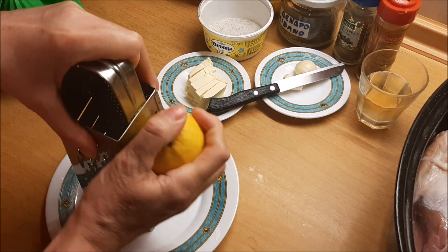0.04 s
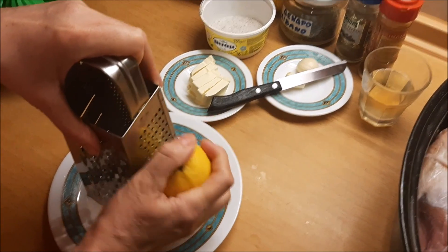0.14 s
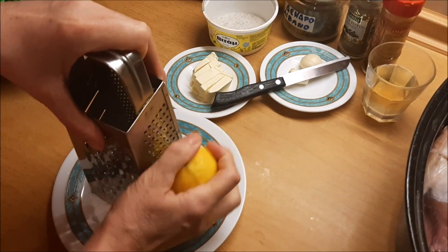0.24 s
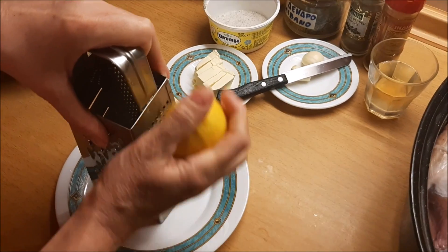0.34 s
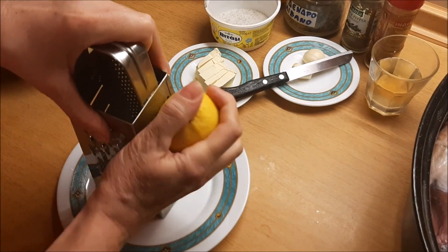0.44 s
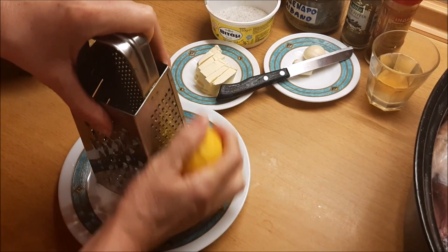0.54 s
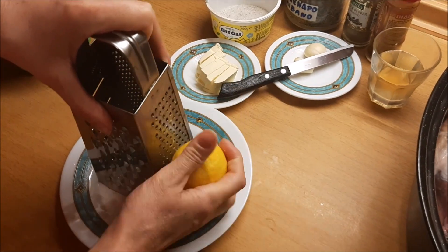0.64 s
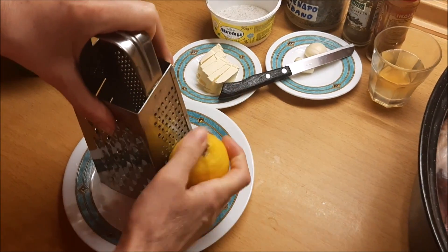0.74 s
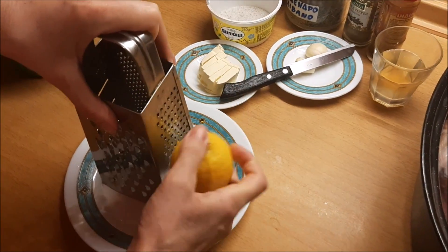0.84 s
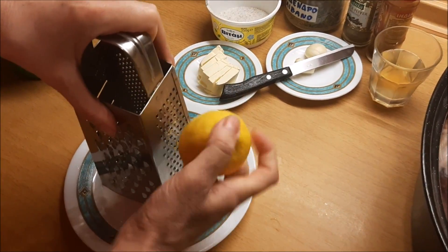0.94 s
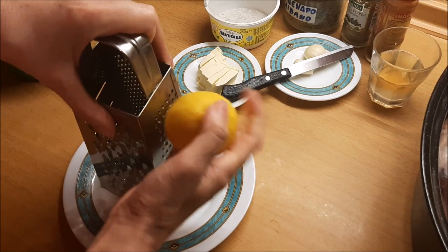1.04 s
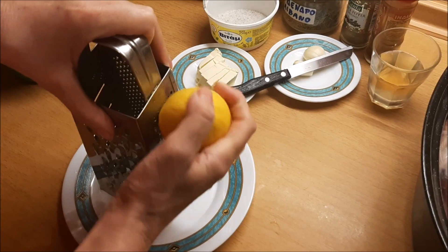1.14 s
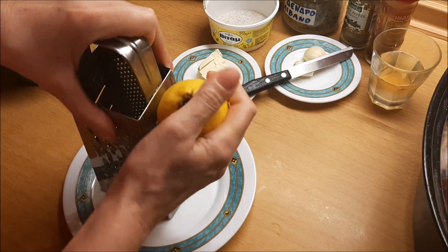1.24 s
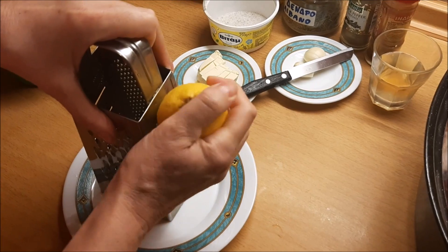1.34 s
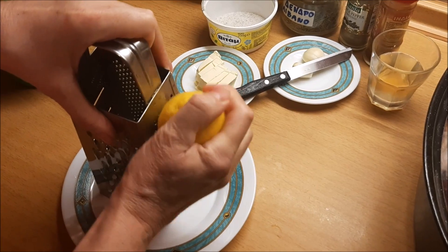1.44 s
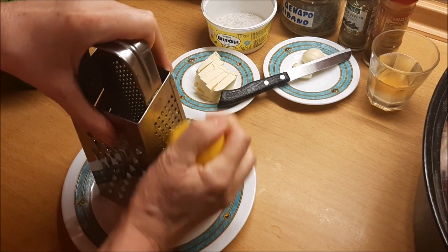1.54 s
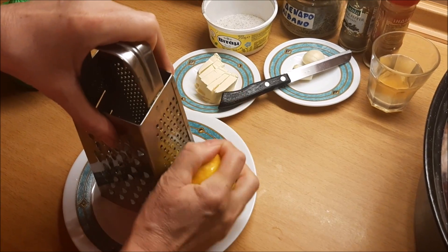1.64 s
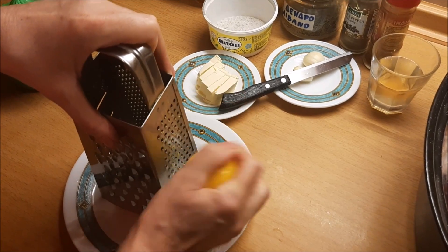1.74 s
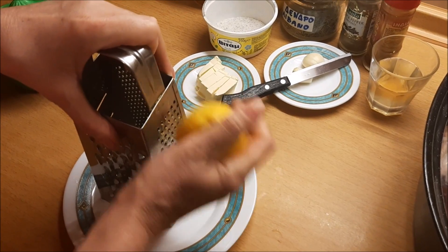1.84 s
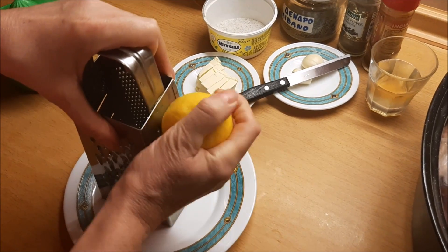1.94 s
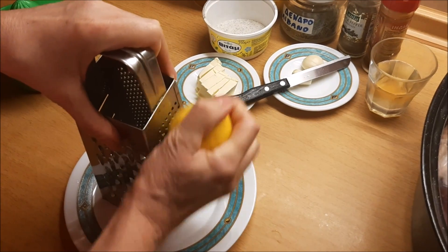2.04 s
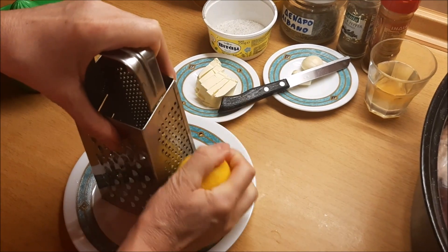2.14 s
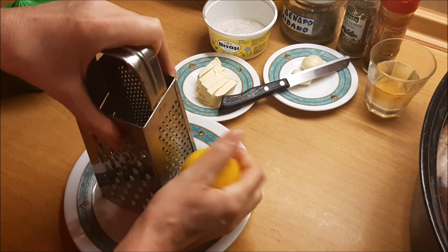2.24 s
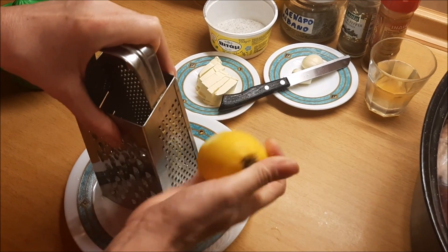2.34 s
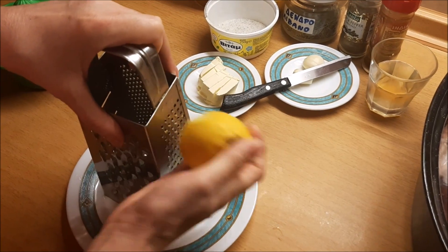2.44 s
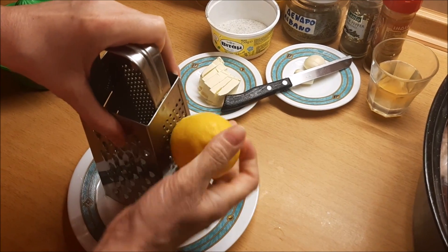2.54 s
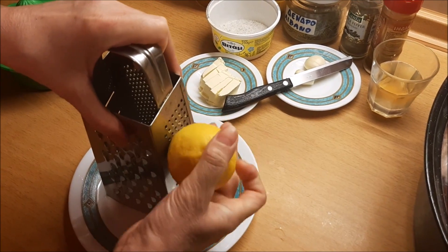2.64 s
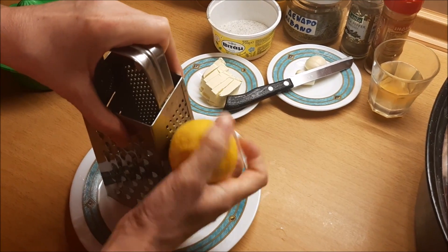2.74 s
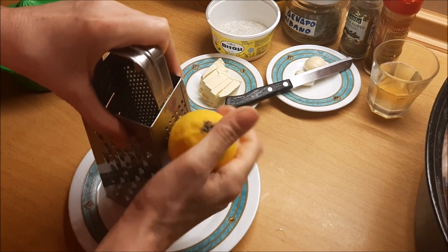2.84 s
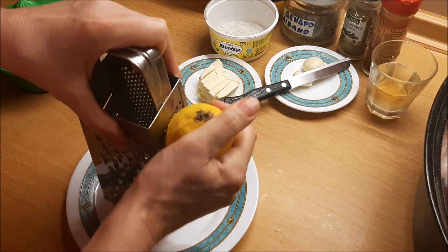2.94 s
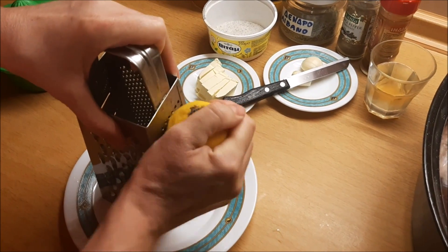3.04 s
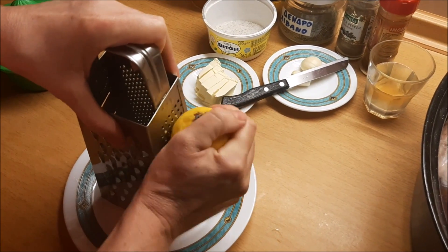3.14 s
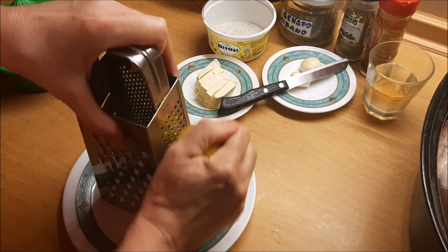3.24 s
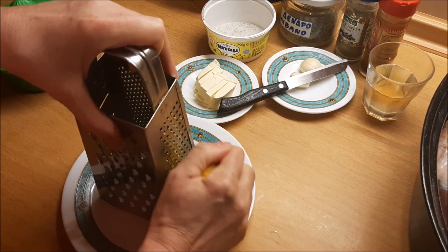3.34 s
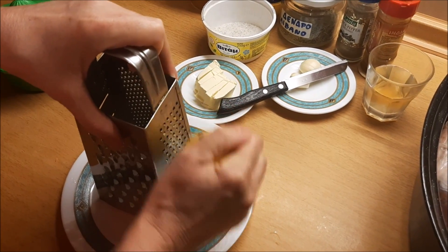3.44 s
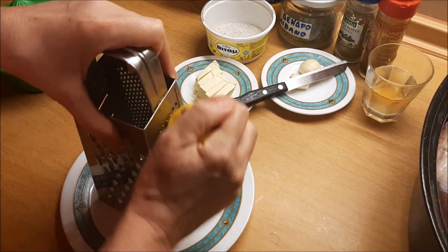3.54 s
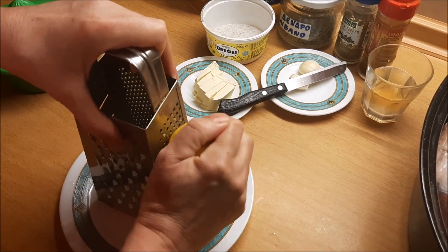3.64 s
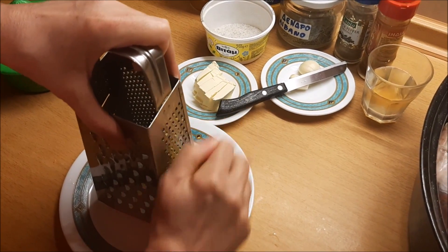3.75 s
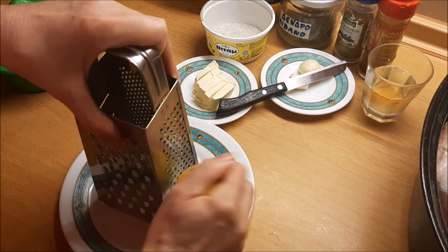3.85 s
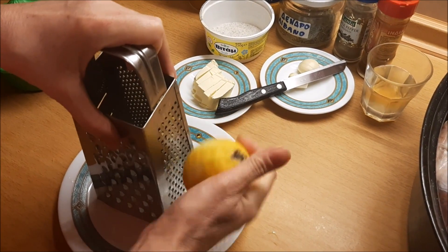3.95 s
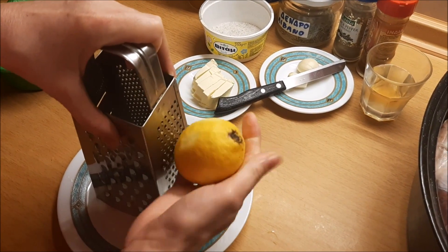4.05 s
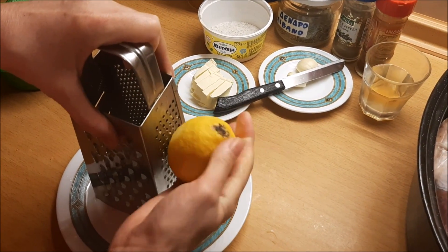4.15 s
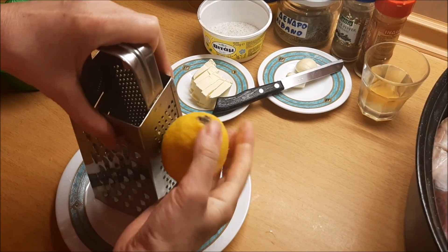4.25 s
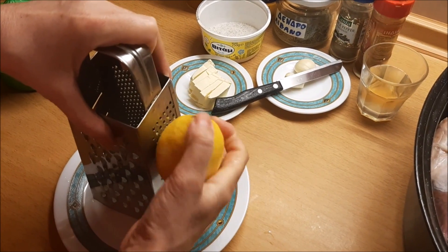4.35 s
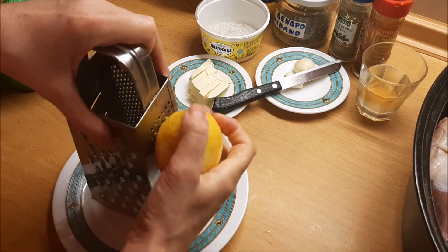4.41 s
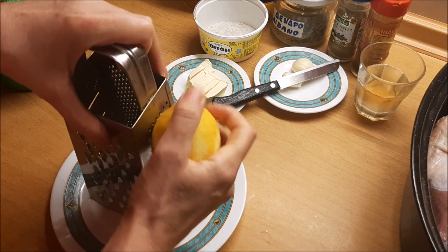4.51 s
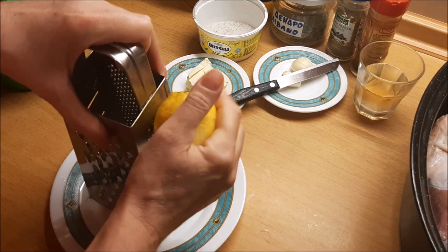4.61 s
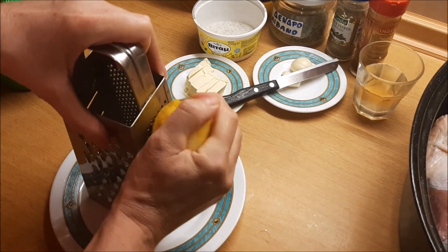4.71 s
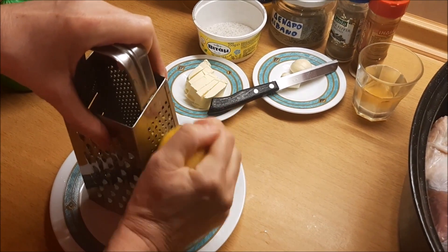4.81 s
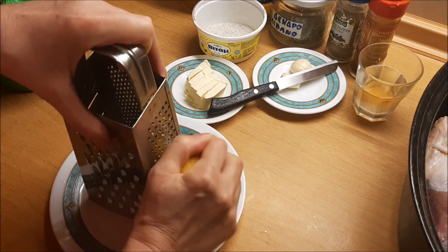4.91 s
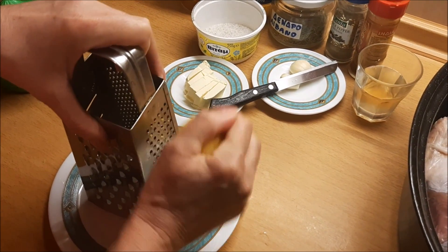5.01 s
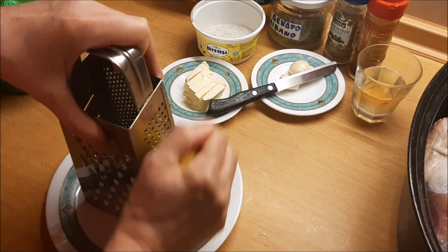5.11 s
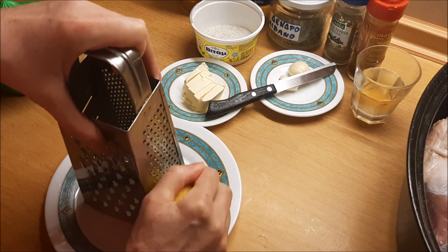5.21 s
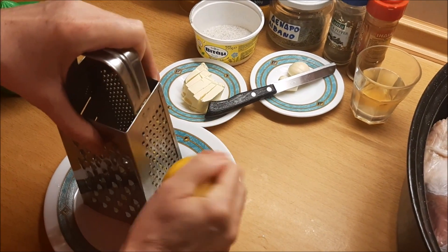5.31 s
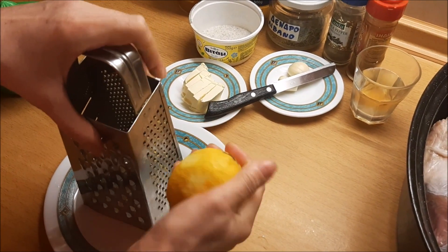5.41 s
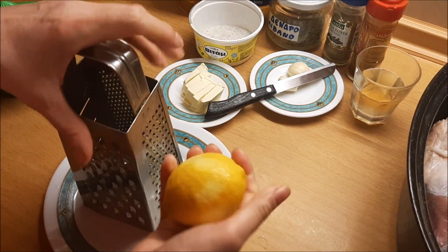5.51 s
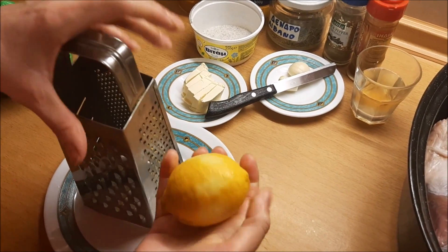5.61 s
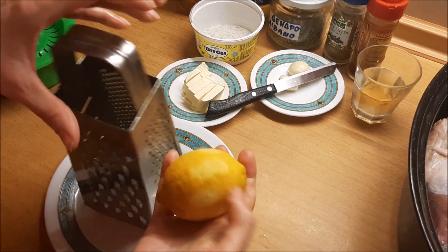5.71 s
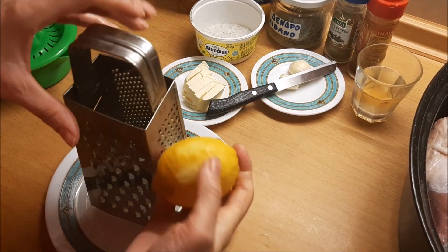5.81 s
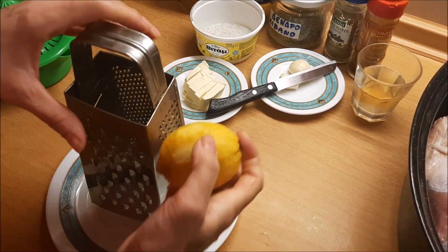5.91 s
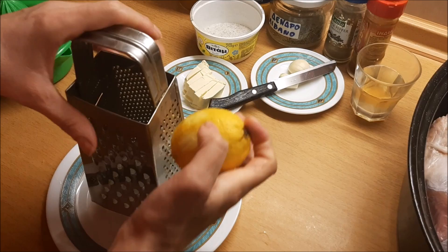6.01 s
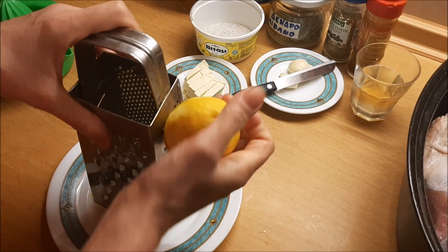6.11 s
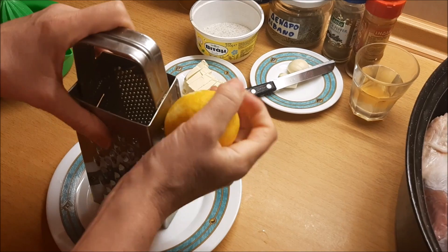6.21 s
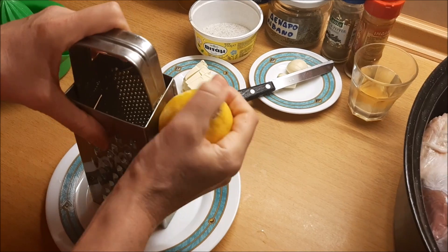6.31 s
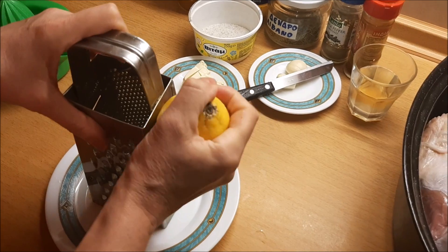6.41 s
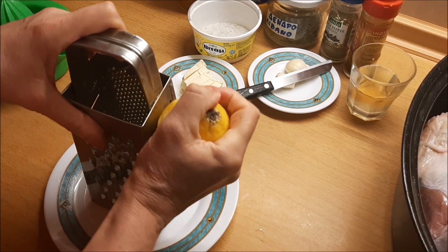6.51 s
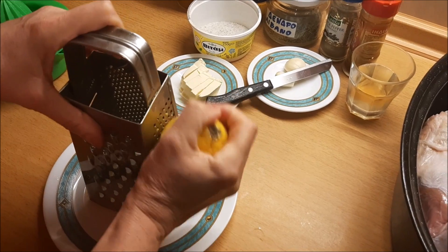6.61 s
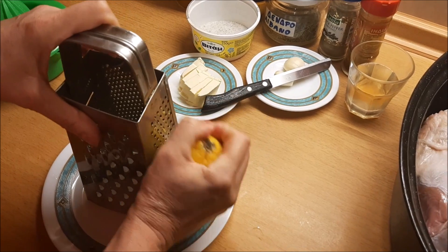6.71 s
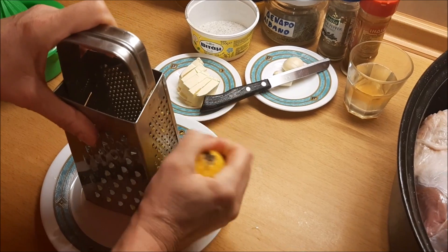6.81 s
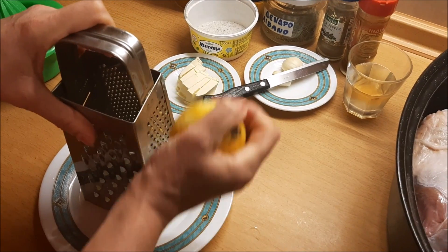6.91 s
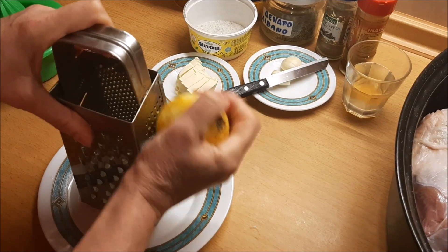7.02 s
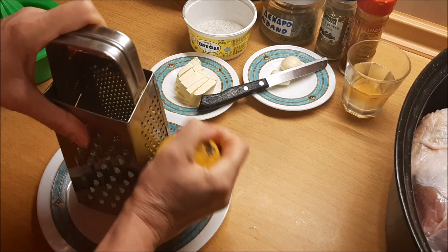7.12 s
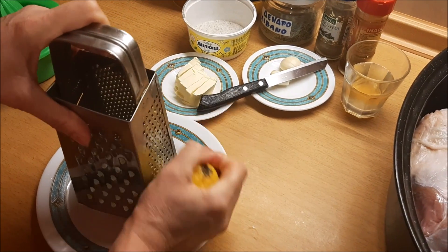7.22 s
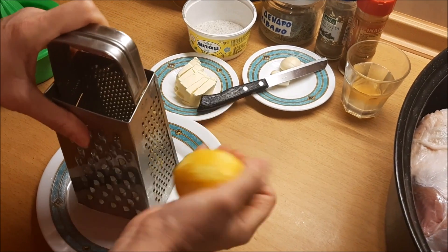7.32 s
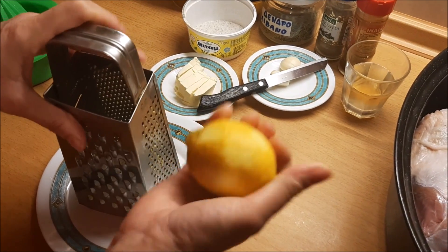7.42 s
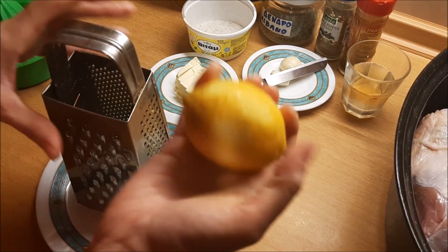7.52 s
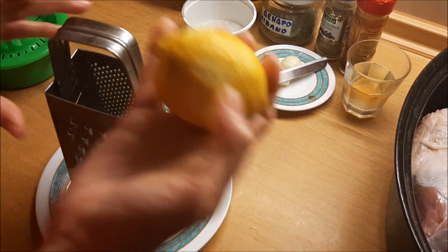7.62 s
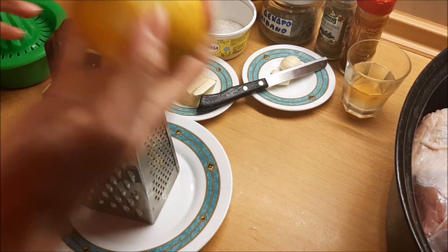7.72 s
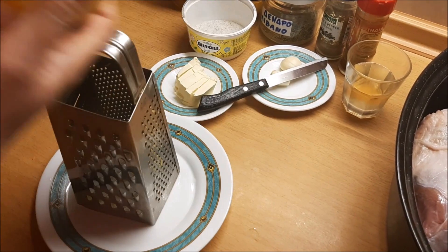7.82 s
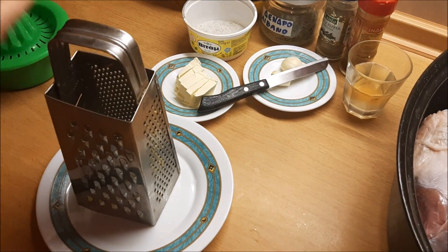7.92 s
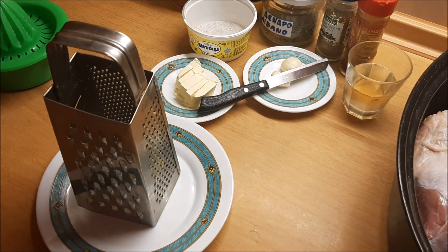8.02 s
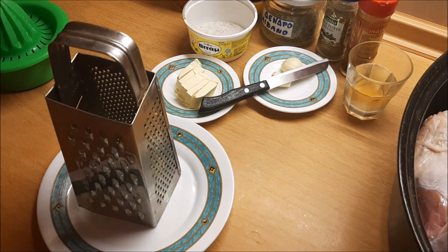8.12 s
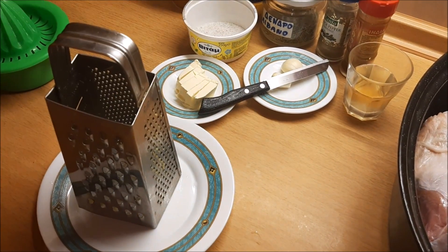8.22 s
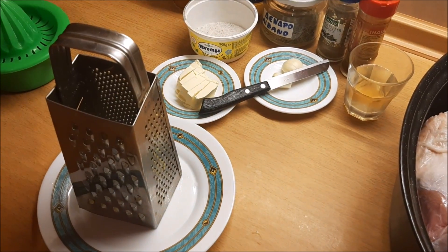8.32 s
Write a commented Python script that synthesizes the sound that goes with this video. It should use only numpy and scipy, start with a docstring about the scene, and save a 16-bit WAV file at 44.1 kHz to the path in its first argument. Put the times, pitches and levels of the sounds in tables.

```python
"""A lemon is rasped in short strokes down a steel box grater standing on a china plate in a small kitchen.
Teeth tear the peel in dense slips that hiss, ring the box and shake the table, and click where they
catch. The box knocks on the plate while held and clinks when shifted. A fridge hums faintly throughout,
and a few dull pats come at the end. Two microphone ports a few centimetres apart give the stereo image."""
import sys
import numpy as np
from scipy import signal
from scipy.fft import rfft, irfft, next_fast_len
from scipy.io import wavfile
from scipy.ndimage import uniform_filter1d

SR = 44100
rng = np.random.default_rng(int(sys.argv[2]) if len(sys.argv) > 2 else 0)


def materialize(psi):
    """Save the field psi as 16-bit PCM at rate SR to the path in sys.argv[1].

    A 1-D psi becomes a single channel; in a 2-D psi each row is a channel.
    """
    bounded = np.clip(np.atleast_2d(psi).T, -1, 1)
    quanta = np.round(bounded * 32767).astype(np.int16)
    wavfile.write(sys.argv[1], SR, quanta)


N = 368676

# resonances of the steel box while rubbed: f/Hz, width/Hz, level/dB
BOX_MODES = [(1074, 23, -22), (1274, 20, -13), (1788, 15, -7), (2163, 65, 0), (3015, 40, -4.5),
             (3195, 47, -7), (3777, 45, -3.5), (4140, 38, -10.5), (4510, 80, -12.5)]


def undb(db):
    """Decibels to gain."""
    return 10 ** (np.asarray(db) / 20)


def level(x, db):
    """Set the rms."""
    return x * undb(db) / np.sqrt(np.mean(x ** 2))


def along(points, hz):
    """Read a curve of (f/Hz, value) points on a log frequency axis."""
    freqs, values = np.transpose(points)
    return np.interp(np.log(hz + 1), np.log(freqs), values)


def shape(x, response):
    """Filter by a response given as a function of Hz."""
    n = next_fast_len(x.shape[-1], True)
    return irfft(rfft(x, n) * response(np.fft.rfftfreq(n, 1 / SR)), n)[..., :x.shape[-1]]


def colour(x, points):
    """EQ a sound with a curve of (f/Hz, level/dB) points."""
    return shape(x, lambda f: undb(along(points, f)))


def ring(x, peaks):
    """Drive resonators (f/Hz, width/Hz, level/dB), summed in alternating polarity."""
    return shape(x, lambda f: sum((-1) ** k * undb(db) * 1j * f * width / (hz ** 2 - f ** 2 + 1j * f * width)
                                  for k, (hz, width, db) in enumerate(peaks)))


def wander(rate):
    """A control signal gliding to `rate` random values a second; spread about 1.5."""
    step = int(SR / rate)
    return 1.8 * uniform_filter1d(np.repeat(rng.standard_normal(N // step + 1), step), step)[:N]


def ports(three, common=0.3, lag_ms=0.13):
    """A wide source: one signal reaches both ports, the right one later; each also hears its own."""
    late = np.roll(three[0], round(lag_ms * SR / 1000))
    return np.sqrt(common) * np.array([three[0], late]) + np.sqrt(1 - common) * three[1:]


def hand_pressure():
    """Gains of tearing, box and table: each stroke presses in, holds over rows of teeth, then lets go."""
    # strokes and light rubs: bite t/s, press-in/s, hold/s, tearing level at bite/dB, at end of hold/dB,
    # tooth rows/Hz, swing per row/dB, box above tearing/dB, table above tearing/dB
    strokes = [(-0.036, 0.024, 0.062, -61, -67, 23, 3.5, 15, 16.5),
               (0.153, 0.097, 0.059, -29.5, -32, 36.0, -1, 5.5, -3.0),
               (0.481, 0.014, 0.081, -37, -28.5, 31.0, 0.5, 5, -3.5),
               (0.574, 0.052, 0.028, -43.5, -35, 37, 0, 9.5, -0.5),
               (0.692, 0.028, 0.053, -51.5, -50.5, 37, 2, 3, -0.5),
               (0.861, 0.04, 0.061, -63, -74, 30.0, 0.0, 1, -4),
               (0.966, 0.01, 0.039, -76.5, -72.5, 19, 0, -1, 7),
               (1.579, 0.16, 0.052, -31.5, -28, 41.5, 1, 5, -1),
               (1.695, 0.021, 0.022, -40.5, -53.0, 41, 3, 6, 7),
               (1.751, 0.027, 0.25, -66, -70.5, 19.5, 1, 2.5, 1.5),
               (2.066, 0.15, 0.002, -48, -43, 22, 1.0, 6, 4.5),
               (2.095, 0.032, 0.063, -23.5, -23.5, 42.0, -1, 3.5, -6.0),
               (3.035, 0.07, 0.007, -70.5, -67.5, 32, 4.5, 9, 8.5),
               (3.092, 0.041, 0.023, -45, -39, 34, 3, 4, 2),
               (3.262, 0.12, 0.096, -34.0, -34, 40.0, 3, 4, -0.0),
               (3.616, 0.044, 0.012, -38.5, -31.5, 32, 5.5, 4, 0.5),
               (3.743, 0.037, 0.048, -30, -26.5, 34.5, 2, 4.5, -2.5),
               (4.043, 0.073, 0.03, -74, -77.0, 19.5, 3, 2.5, 7),
               (4.164, 0.021, 0.002, -81, -71, 29, 2, 9.5, 19.5),
               (4.341, 0.025, 0.019, -76.5, -74, 25.5, 4, 2.5, 21),
               (4.398, 0.027, 0.0035, -68, -65, 63, 2.5, 8, 10.5),
               (4.483, 0.032, 0.028, -55.5, -54.5, 48, 1.5, 0, -2.5),
               (4.616, 0.057, 0.083, -67.5, -76.5, 33, -1, -2, 0),
               (4.706, 0.01, 0.071, -68, -61.5, 29.0, 2.5, -1.5, 8),
               (4.829, 0.07, 0.039, -34, -29, 40.0, 5, 4.5, -1),
               (4.909, 0.013, 0.03, -39, -40.5, 45, 4.5, 6.0, 7.5),
               (5.2, 0.056, 0.027, -23.5, -28.5, 30, 2.5, 5, -6.5),
               (5.349, 0.012, 0.11, -67.5, -76, 18.0, 2, 7, -1.0),
               (5.493, 0.038, 0.012, -68.5, -66, 25, 1, 1, -1),
               (5.551, 0.02, 0.016, -60.5, -58, 31.0, 1, 4, -13.5),
               (6.41, 0.072, 0.002, -78.5, -86.5, 15, 3, -2.5, -5.5),
               (6.518, 0.018, 0.068, -75, -65.5, 28.5, 0, -3, 10),
               (6.598, 0.025, 0.007, -57.0, -54.5, 43.5, 0, 4.5, 7.5),
               (6.654, 0.024, 0.025, -37.5, -35, 37.5, 2, 4.5, 0),
               (6.71, 0.018, 0.091, -34.5, -42, 27.5, 3.5, 4.0, 1),
               (7.08, 0.029, 0.067, -50, -45, 28, 4.5, 11.5, 10),
               (7.111, 0.031, 0.1, -37.0, -28, 28, 5, 2, -4.5),
               (7.37, 0.032, 0.16, -70.5, -68, 18.5, -1, -3, -7),
               (7.515, 0.025, 0.029, -59.5, -69, 25, -3, 1.5, -14)]
    touch_db, lift_db_per_s2 = -47, 8779  # first touch below the bite; ever faster fall on letting go
    box_follow, table_follow = 1.12, 0.48  # how strongly each follows the pressure
    t, power = np.arange(N) / SR, np.zeros((3, N))
    for bite, press_s, hold_s, bite_db, ease_db, row_hz, swing_db, box_db, table_db in strokes:
        touch, ease = bite - press_s, bite + hold_s
        on = (t >= touch) & (t <= ease + .2)
        now = t[on]
        held_db = np.interp(now, [bite, ease], [bite_db, ease_db])
        slack_db = touch_db * np.interp(now, [touch, bite], [1, 0]) ** 2
        slack_db -= lift_db_per_s2 * np.maximum(now - ease, 0) ** 2
        row_db = swing_db * np.cos(2 * np.pi * row_hz * (now - bite))
        fade_in = np.clip((now - touch) / 0.02, 0, 1)
        gains = undb([held_db + slack_db + row_db,
                      held_db + box_db + box_follow * (slack_db + row_db),
                      held_db + table_db + table_follow * slack_db])
        power[:, on] += (fade_in * gains) ** 2
    return np.sqrt(power)


def peel_slips(per_s, spread_db, channels):
    """Dense tiny tears of peel: clicks of random size and sign, at the same moments in all channels."""
    size = (rng.random(N) < per_s / SR) * undb(spread_db * np.minimum(rng.exponential(size=N), 4))
    return size * rng.standard_normal((channels, N))


def grating():
    """Tearing hiss, box ring and table thrum, all jolted as the teeth catch the peel."""
    # spectrum of tearing peel: f/Hz, level/dB
    tear_eq = [(400, -20.5), (700, -10), (1000, -3.5), (1700, -5.5), (2400, -4), (3800, -4.5), (5200, -7),
               (7200, -11.5), (8200, -22), (11000, -17), (14500, -23.5), (16000, -26)]
    # table and plate shaken by the stroke: f/Hz, width/Hz, level/dB
    table_modes = [(72, 30, -29.5), (137.4, 7.7, 6), (185, 12, -4), (217, 34, -7), (320, 48, -7.5),
                   (396, 25, -3.5), (534, 58, -5.5), (720, 67, -16.5)]
    tear_gain, box_gain, table_gain = hand_pressure()
    catch = np.clip(wander(70), -2, 2)
    tears = ports(peel_slips(9000, spread_db=1.5, channels=3))
    hiss = colour(tears, tear_eq)
    sizzle = signal.sosfilt(signal.butter(2, 4500, "high", fs=SR, output="sos"), hiss)
    # the lemon moves over the sheet, so the resonances wake in turns
    sheet = sum(ring(tears * undb(4.0 * np.clip(wander(45), -2, 2)), BOX_MODES[k::3]) for k in range(3))
    box = level(sheet, -3.0) + level(hiss - sizzle, -3.5)
    thrum = ring(peel_slips(3000, spread_db=2.0, channels=1), table_modes)
    return (tear_gain * level(sizzle * undb(1.5 * catch + 0.94 * wander(200)), 0.78)
            + box_gain * level(box * undb(0.8 * catch), 0.93)
            + table_gain * level(thrum * undb(1.2 * catch), -2.8))


def room_tone():
    """Room air and microphone hiss, centred in the bass, with the air's faint murmur in the box."""
    # spectrum of the noise bed: f/Hz, level/dB
    air_eq = [(15, -50), (25, -21), (53, -16), (76, -23), (195, -24.5), (217, -17), (249, -16.5),
              (285, -20.5), (335, -25), (607, -37), (3620, -41), (16000, -43)]
    mid, side = colour(rng.standard_normal((2, N)), air_eq)
    side = signal.lfilter(*signal.butter(1, 200, "high", fs=SR), side)
    air = level(np.array([mid + side, mid - side]), -69.5) * undb(0.6 * wander(3))
    return air + level(ring(side, BOX_MODES[3:4]), -86)


def fridge():
    """A wavering hum with a faint drone below it."""
    # the hum swells and sinks: t/s, level/dB
    swell = [(0, -73), (2.9, -76.5), (4.699, -72), (6.3, -77.5), (6.6, -74.5), (7.6, -68.5), (8.36, -67.5)]
    pitch_hz = 286 + 2.5 * wander(11)
    hum_db = np.interp(np.arange(N) / SR, *np.transpose(swell)) + 2.5 * wander(7)
    hum = undb(hum_db) * np.sin(2 * np.pi * np.cumsum(pitch_hz) / SR)
    drone = ring(rng.standard_normal(N), [(99, 9, 0)])
    return hum + level(drone, -77.5)


def clinks(blows, modes, clatter_db, clatter_t60, contact_ms, gain_db):
    """A blow rings the modes over a clatter of countless short ones; where it lands sets the tone."""
    out, t = np.zeros((2, N + SR)), np.arange(SR // 4) / SR
    hz, db, t60 = np.transpose(modes)[:, :, None]
    decay = np.exp(-np.log(1000) * t / t60)
    attack = np.sin(np.pi / 2 * np.clip(t * 1000 / contact_ms, 0, 1)) ** 2
    for at, blow_db, low_db, upper_db, high_db in blows:
        lows = [(100, low_db - 29), (250, low_db - 3.5), (500, low_db), (1500, low_db)]
        mids = [(1750, 0.0059), (2500, 0.0076)]
        uppers = [(2800, upper_db), (4200, upper_db)]
        highs = [(4600, high_db), (8000, high_db - 9.5), (16000, high_db - 23.5)]
        detune, phase, spread, strength = np.hsplit(rng.standard_normal((len(modes), 4)), 4)
        gains = undb(db + along(lows + mids + uppers + highs, hz) + 2.2 * strength)
        cycles = hz * (1 + 0.0022 * detune) * t + 0.14 * phase  # all modes start nearly together
        # each mode reaches the two ports with its own phase, closer for long waves
        port_phase = np.outer([1, -1], np.clip(hz / 1500, 0, 1) * (0.5 + 0.72 * spread))
        body = (np.exp(1j * port_phase) @ (gains * decay * np.exp(2j * np.pi * cycles))).imag
        clatter = colour(ports(rng.standard_normal((3, len(t)))), lows + mids + highs)
        clatter *= undb(clatter_db) * np.exp(-np.log(1000) * t / clatter_t60)
        start = int(at * SR)
        out[:, start:start + len(t)] += undb(blow_db + gain_db) * attack * (body + clatter)
    return out[:, :N]


def knocks_and_catches():
    """Knocks of the held grater on the plate, and bright clicks as its teeth catch the peel mid-stroke."""
    # knocks and catches: t/s, level/dB, lows/dB, upper ring/dB, highs/dB
    hits = [(0.433, -12.5, -4.5, -16.5, -8.5), (0.7495, -32, 0.5, -7, -14),
            (1.1233, -23.5, -5.5, -9.5, -12), (1.9355, -44.5, 9, -9.5, -18.5), (2.0522, -46.5, 6, 8.5, 9.5),
            (2.0901, -22.5, -20, -1.5, -8.5), (2.521, -17.5, -5.5, -8, -12.5), (3.0889, -41, 4, -3, 1),
            (3.5544, -18.5, -5.5, -13.5, -12), (3.6107, -36, -7, 6.5, 0.5), (3.7414, -27.5, -30, -15, -11),
            (3.7658, -22, -11, -16, -6), (4.8054, -33, 1.5, -9, -1.5), (4.8734, -31.5, -9, 5, -0.5),
            (5.1434, -9.5, -4, -5.5, -6), (6.6484, -36.5, -8, -7.5, -6), (7.074, -28.5, -6, -15, -9.5),
            (7.1074, -20.5, -12, -18, -10.5)]
    # modes of the held box and plate: f/Hz, level/dB, t60/s
    held_modes = [(142.5, 6.5, 0.16), (530, -10, 0.11), (665.3, -11, 0.076), (830, -4.5, 0.078),
                  (1003, -9.5, 0.13), (1445, -3, 0.069), (1803, -14, 0.095), (2049, -7.5, .07),
                  (2232, 0, 0.077), (2343, -12, 0.16), (2972, -0.5, 0.16), (3250, -17, 0.045),
                  (3750, -9, 0.056), (3976, 2, 0.12), (4370, -8.5, .05), (5760, -6, .05), (6850, -8, .06)]
    return clinks(hits, held_modes, clatter_db=9.0, clatter_t60=0.088, contact_ms=6, gain_db=1.5)


def box_shifts():
    """The freed box is shifted and its feet tap the plate with a brighter ring."""
    # taps: t/s, level/dB, lows/dB, upper ring/dB, highs/dB
    taps = [(5.5767, -23, -7.5, -12.5, -17), (5.5994, -33, 3.5, -16, -14), (5.673, -40, 8.5, -5, -8.5),
            (5.7937, -5.5, -10.5, -8.5, -9), (5.8154, -15.5, 0, -6, -7), (5.849, -11, -10.5, -13, -10.5),
            (5.8744, -31.5, 4.5, -22, -30), (5.9194, -44, -10, -23, -30), (6.0951, -40, 2.5, -5, -14),
            (6.113, -35, 3, -12, -13.5), (6.1769, -46.5, 4.5, -16, -13.5), (7.5529, -16, -13, -14, -13.5),
            (7.5714, -32.5, 3, -26, -28), (7.7358, -48.5, 2.5, -8, -13)]
    # modes of the free box: f/Hz, level/dB, t60/s
    free_modes = [(145, -2, 0.17), (562, -12.5, 0.039), (1027, -8.5, 0.055), (1381, -4.5, .045),
                  (2076, -4, 0.09), (2129, 4, .045), (2152, -11, .05), (3050, -6.5, 0.029),
                  (3484, -0.5, 0.056), (3540, 1, .05), (3840, 1, 0.036), (4550, -8.5, 0.071),
                  (5234, 0.5, .04), (5470, -1, 0.058), (7160, 2.5, .04), (7773, -4.5, .04),
                  (9540, -1, 0.061), (10174, -3, 0.046), (12670, 1, 0.05)]
    return clinks(taps, free_modes, clatter_db=4.0, clatter_t60=0.098, contact_ms=4.5, gain_db=2.5)


def pats():
    """Soft pats further off: brief dull puffs of noise."""
    # puffs: t/s, level/dB, centre f/Hz
    puffs = [(8.0106, -50.5, 1430), (8.1273, -59.5, 2030), (8.1483, -60.5, 2037), (8.194, -61, 1550)]
    out, t = np.zeros((2, N + SR)), np.arange(SR // 4) / SR
    envelope = np.clip(t / 0.0041, 0, 1) * np.exp(-t / 0.027)
    for at, db, hz in puffs:
        band = [(hz / 3, -22), (hz / 1.25, 0), (hz * 1.25, 0), (hz * 1.6, -5), (hz * 4, -22)]
        puff = colour(ports(rng.standard_normal((3, len(t)))), band)
        start = int(at * SR)
        out[:, start:start + len(t)] += undb(db + 6.5) * puff * envelope
    return out[:, :N]


def kitchen_reverb(x, wet_db):
    """The small room's echoes: a noise tail for each port, dying faster in the high octaves."""
    # decay of the room: f/Hz, t60/s
    decay_times = [(60, 1), (250, 0.52), (700, 0.52), (2000, 0.27), (5000, 0.25), (10000, 0.13),
                   (16000, .15)]
    t, tail = np.arange(SR) / SR, 0
    for hz in 62.5 * 2. ** np.arange(8):
        top_hz = 20000 if hz > 7000 else hz * np.sqrt(2)
        band = signal.butter(2, [hz / np.sqrt(2), top_hz], "band", fs=SR, output="sos")
        shared, own = rng.standard_normal(SR), rng.standard_normal((2, SR))
        apart = min(hz / 700, 1)  # long waves reach both ports alike
        echoes = signal.sosfilt(band, apart * own + np.sqrt(1 - apart ** 2) * shared)
        tail += echoes * np.exp(-np.log(1000) * t / along(decay_times, hz))
    tail *= np.clip(t / 0.003, 0, 1)
    tail *= undb(wet_db) / np.linalg.norm(tail, axis=1, keepdims=True)
    return signal.fftconvolve(x[None], tail, axes=1)[:, :N]


def scene():
    """Grating, clinks and pats with their reverb, thinned in the bass, over room tone and fridge."""
    # bass roll-off of the microphone: f/Hz, level/dB
    mic_eq = [(20, -19), (60, -7), (110, -4.5), (200, 0), (16000, 0)]
    direct = grating() + knocks_and_catches() + box_shifts() + pats()
    return colour(direct + kitchen_reverb(direct[0], wet_db=-10), mic_eq) + room_tone() + fridge()


def record(dry):
    """Soft saturation rounds the loudest peaks and a steep low-pass cuts the top."""
    rounded = dry / (1 + np.abs(dry) ** 4) ** (1 / 4)
    return .93 * signal.sosfilt(signal.ellip(10, .2, 80, 15780, fs=SR, output="sos"), rounded)


dry = scene()
out = record(dry)
materialize(out)
```